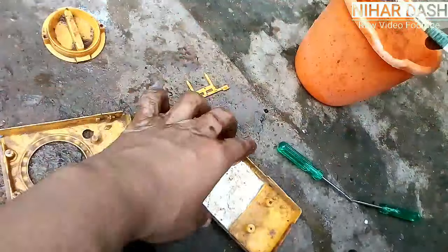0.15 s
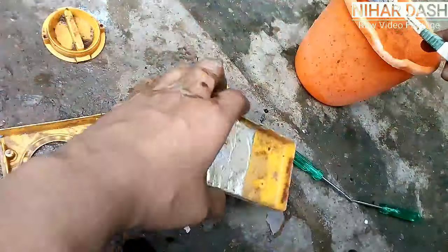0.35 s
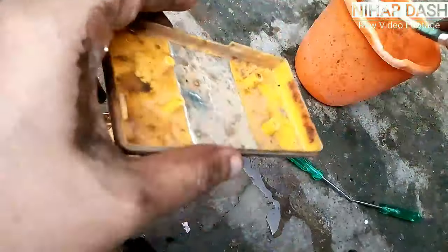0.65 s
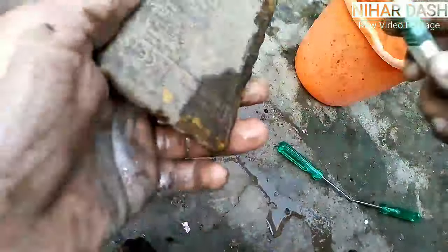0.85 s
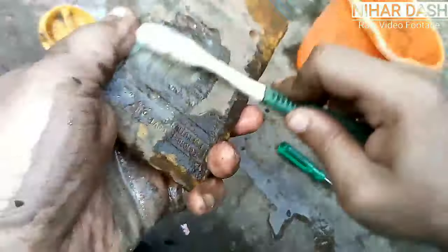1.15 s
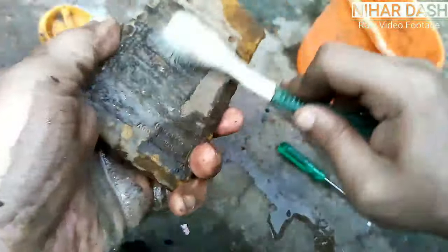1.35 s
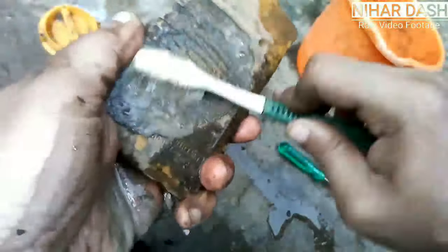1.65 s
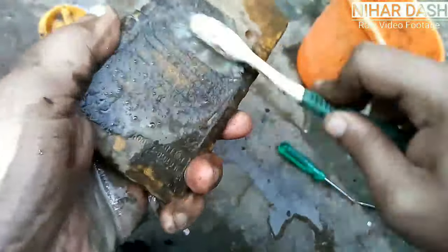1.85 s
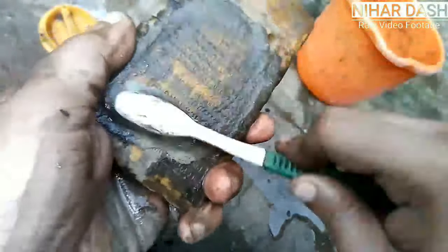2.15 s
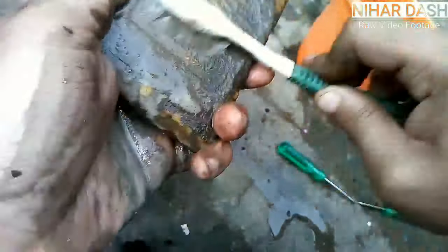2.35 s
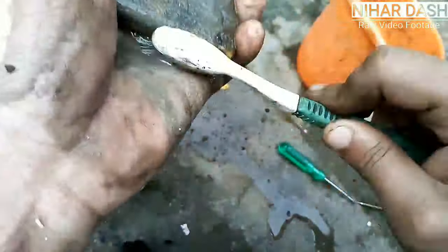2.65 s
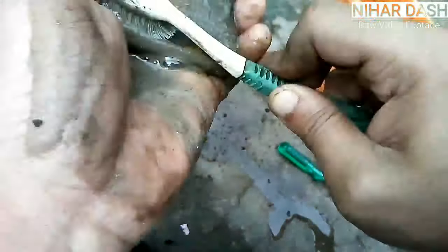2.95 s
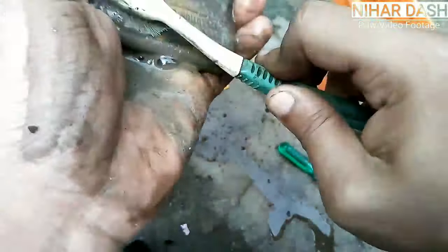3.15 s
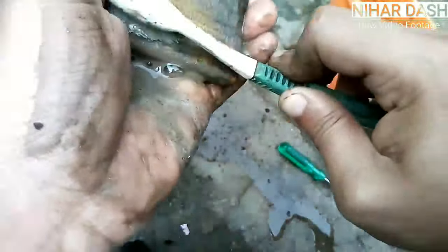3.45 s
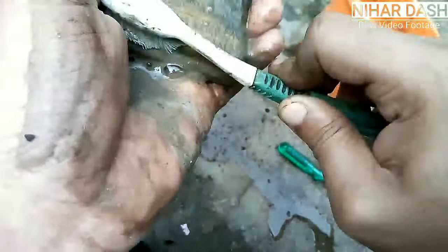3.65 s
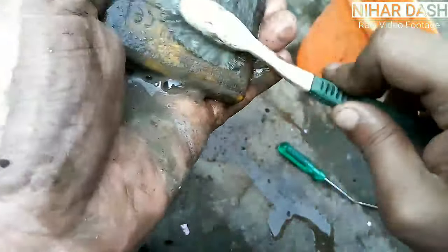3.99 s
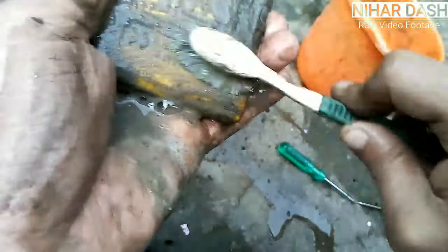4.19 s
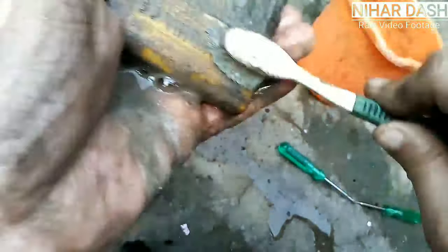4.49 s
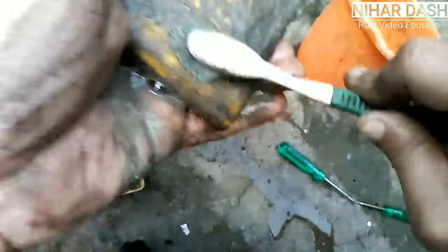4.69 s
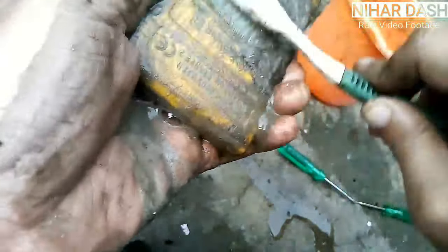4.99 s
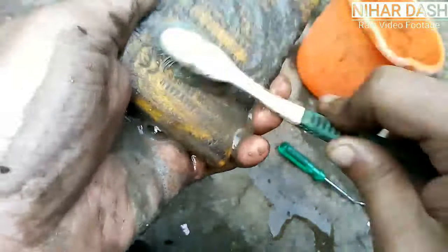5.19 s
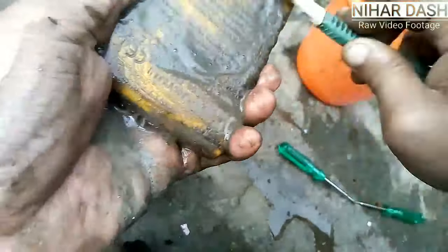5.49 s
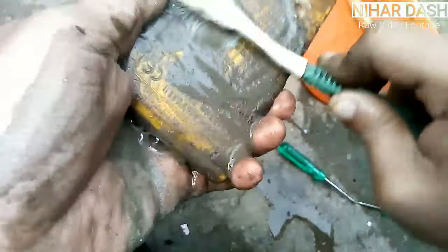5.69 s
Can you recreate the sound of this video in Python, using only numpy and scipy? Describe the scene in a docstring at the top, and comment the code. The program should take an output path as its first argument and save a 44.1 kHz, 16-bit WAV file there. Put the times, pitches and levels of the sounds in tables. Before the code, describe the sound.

A close, dry phone-like pickup of a toothbrush scrubbing a wet plastic case held in one hand. From 0 to 1.55 s, runs of quick, even strokes, roughly 20 to 30 a second, rasp with a boxy hollow tone; small wet squelches pop within them, and soft dull hand bumps come near 0.33, 0.85 and 1.45 s. After brief light touches, soapy, brighter strokes run from 1.8 s, fading very faint around 2.2-2.45 s. From 2.6 s brushing returns on the rim, thin and crisp with little hollow, and bent tufts snap sharply near 2.76, 3.0 and 3.45 s. From 4 s the corner gives slightly more body, with bright snaps at 4.5, 4.7 and 4.8 s. Scrubbing stops about 4.83 s. Faint murmuring air, thin wavering whistles and tiny chirps remain, with sparse tip grazes, a dull drop at 5.52 s and two light brushes near 5.8 s.

```python
"""A toothbrush scrubs a wet plastic case held in one hand, in runs of quick, even pushes and pulls.
Each stroke is a swarm of bristle slips that ring the thin wall and the hollow of the case, with a tone
that changes with the spot brushed. Wet tufts squelch as decaying sines; bent tufts snap free, and a drop
lands, as noise bursts into resonances. The hand bumps as damped sines and shifts its grip as dull noise.
At the end only the tips graze the case, over a faint wavering background of filtered noise."""
import sys
import numpy as np
from scipy import signal
from scipy.fft import rfft, irfft
from scipy.io import wavfile

SR = 44100
rng = np.random.default_rng(int(sys.argv[2]) if len(sys.argv) > 2 else 0)


def pcm_store(signal):
    """Save signal as 16-bit PCM."""
    levels = np.round(np.clip(np.atleast_2d(signal), -1, 1) * 32767)
    wavfile.write(sys.argv[1], SR, levels.astype(np.int16).T)


N = 257103
TIME = np.arange(N) / SR  # seconds

# Resonances of the case at each spot that is brushed.
# Each row: centre in Hz, width in Hz, relative level in dB.
FLAT_BACK = [(488, 107, -6), (795, 69, -9), (1082, 57, -1), (1271, 134, 4), (1760, 490, -5),
             (1670, 760, -2), (2860, 1200, -3), (4160, 340, -3.5), (4910, 1400, -0.5), (6500, 1130, 3.5)]
SOAPY_BACK = [(344, 59, -7), (1010, 120, -14), (1505, 160, -2.5), (2040, 220, 4.5), (2950, 370, 4),
              (5250, 1700, 4), (6890, 980, 11.5)]
RIM = [(452, 190, -26.5), (916, 140, -12), (2225, 600, -4.5), (3450, 1200, -12), (4030, 990, -6),
       (6180, 1020, 1), (6730, 1000, -3)]
CORNER = [(370, 123, -13), (745, 140, -15.5), (865, 150, -9.5), (1697.6, 220, -5.5), (2340, 630, 1),
          (3680, 690, 2.5), (4170, 1300, -28), (5760, 1040, 7), (7230, 820, 8.5)]
FAR_EDGE = [(1200, 820, -18), (3750, 260, -22), (5700, 620, -2), (6600, 330, 4), (7600, 360, 2),
            (8000, 410, -3)]
# The brush moves over the case. Each row: start in seconds, resonances of the spot.
SPOTS = [(0, FLAT_BACK), (1.6, SOAPY_BACK), (2.545, RIM), (3.99, CORNER), (5.4, FAR_EDGE)]


def undb(db):
    """Decibels to gain."""
    return 10 ** (np.asarray(db) / 20)


def unit(x):
    """Scale to rms 1."""
    return x / np.sqrt(np.mean(x ** 2) + 1e-20)


def peak(x, db):
    """Scale to a peak level."""
    return x * undb(db) / (np.abs(x).max() + 1e-20)


def colour(x, points, size=4096):
    """Causal minimum-phase filter through the given (Hz, dB) points, built by folding the cepstrum."""
    hz, db = np.transpose(points)
    grid = np.fft.rfftfreq(size, 1 / SR) + 1
    response_db = np.interp(np.log(grid), np.log(hz), db)
    cepstrum = irfft(np.log(undb(response_db)))
    cepstrum[1:size // 2] *= 2
    cepstrum[size // 2 + 1:] = 0
    impulse = irfft(np.exp(rfft(cepstrum)))
    return signal.fftconvolve(x, impulse)[:len(x)]


def ring(x, modes):
    """Parallel resonances (Hz, width in Hz, dB); neighbouring modes move in opposite directions."""
    out = 0
    for k, (hz, width, db) in enumerate(modes):
        b, a = signal.iirpeak(hz, hz / width, fs=SR)
        out = out + (-1) ** k * undb(db) * signal.lfilter(b, a, x)
    return out


def walk(rate):
    """Smooth random wander with a spread near 1, heading for a new value `rate` times a second."""
    knots = rng.standard_normal(N // 8)
    return 1.2 * np.interp(TIME * rate, np.arange(len(knots)), knots)


def swell(t, middle, length, steep):
    """Amplitude of one rub: it speeds up, then slows to a halt."""
    return np.exp(-np.abs(2 * (t - middle) / length) ** steep)


def add(out, s, x):
    """Mix a short sound in at time s."""
    start = int(s * SR)
    out[start:start + len(x)] += x[:N - start]


def tap(decay_s, size=4096):
    """A short rough contact force: decaying noise."""
    return rng.standard_normal(size) * np.exp(-np.arange(size) / SR / decay_s)


def narrow_band(hz, width):
    """A narrow, wavering band of noise, its sides steepened by two passes of one resonance."""
    mode = [(hz, width, 0)]
    return unit(ring(ring(rng.standard_normal(N), mode), mode))


def slips(rate, scatter_db, size=N):
    """Single bristles let go at random, `rate` a second, some much harder than others."""
    clicks = (rng.random(size) < rate / SR) * rng.choice([-1, 1], size)
    strength_db = scatter_db * np.clip(rng.standard_normal(size), -2, 2)
    return unit(clicks * undb(strength_db))


def rubbed(bristles, modes, drift, scatter_db):
    """Each resonance is fed by its own bristles; the contact point shifts its pitch and strength."""
    chance = np.clip(rng.standard_normal((len(modes), 2)), -2, 2)
    out = 0
    for force, (hz, width, db), (shift, strength) in zip(bristles, modes, chance):
        out = out + ring(force, [(hz * (1 + drift * shift), width, db + scatter_db * strength)])
    return out


def glance(x, gain_db, farthest_s, count=4):
    """Reflections off the palm, fingers and floor; their paths change with every stroke."""
    response = np.zeros(SR // 50)
    response[0] = 1
    for reach in rng.uniform(.15, 1, count):
        response[int(reach * farthest_s * SR)] += undb(gain_db)
    return signal.fftconvolve(x, response)[:len(x)]


def strokes():
    """The hand splits each run into equal pushes and pulls: (middle s, length s, bristle dB, hollow dB)."""
    # Runs of even back-and-forth strokes. Each row: start in seconds, end in seconds, number of strokes,
    # share of each stroke in contact, accent in dB (raises the first and every other stroke, lowers
    # the rest), nominal level of the hollow in dB relative to the bristles.
    runs = [(-.002, 0.105, 3, 0.93, -2.5, -7), (0.114, 0.187, 2, 0.92, 0, -10),
            (0.198, 0.275, 2, 0.72, 2, -9), (0.281, 0.454, 4, 0.8, 1, -7.5),
            (0.451, 0.547, 3, 0.88, -.5, -6.5), (0.536, 0.618, 2, 0.78, -2, -5),
            (0.622, 0.932, 8, 0.94, 1.5, -5), (0.929, 1.136, 5, 1, 1, -4.5),
            (1.143, 1.551, 10, 0.98, 0.7, -7.5), (1.791, 1.99, 4, 0.72, 1.5, -11.5),
            (1.994, 2.183, 4, 0.74, 1.5, -14), (2.159, 2.276, 2, 1, 1, -13),
            (2.27, 2.46, 4, 0.79, 1.5, -24), (2.62, 2.818, 5, 0.81, -1.5, -27),
            (2.836, 3.021, 4, 0.83, 0, -25.5), (3.128, 3.221, 2, 0.76, 0, -32),
            (3.23, 3.322, 3, 0.94, 3, -34), (3.336, 3.401, 2, 0.98, -1.5, -31),
            (3.4, 3.56, 4, 0.79, -2, -27.5), (3.569, 3.712, 4, 0.84, -1, -25),
            (3.718, 4.03, 8, 0.73, -0.5, -26), (4.04, 4.268, 6, 0.93, 0, -22.5),
            (4.273, 4.566, 7, 0.72, -1, -17.5), (4.568, 4.706, 4, 0.79, 0, -17.5),
            (4.716, 4.828, 3, 1, 0, -17.5)]
    # How hard the brush is pressed. Each row: time in seconds, nominal bristle level in dB.
    pressure = [(0, -33), (.2, -33.5), (.53, -33), (.565, -41.5), (.62, -36.5), (.82, -34), (1.1, -37.5),
                (1.2, -33), (1.36, -40), (1.53, -37.5), (1.84, -46.5), (1.95, -37.5), (2.16, -50),
                (2.21, -69), (2.25, -65.5), (2.31, -53), (2.44, -58.5), (2.63, -41), (2.75, -35.5),
                (2.8, -40.5), (3.0, -34), (3.16, -39.5), (3.42, -33), (3.97, -36.5), (4.42, -32.5),
                (4.81, -31)]
    # Single light touches of the tips. Each row: middle in seconds, length in seconds,
    # nominal bristle level in dB.
    touches = [(1.574, 0.038, -47.5), (1.651, 0.064, -48), (1.813, 0.22, -64), (2.504, 0.039, -48),
               (2.584, 0.048, -44.5), (3.061, 0.056, -47), (3.118, 0.018, -48.5), (4.871, 0.017, -64),
               (5.181, 0.015, -64.5), (5.46, .039, -73), (5.51, 0.029, -63.5), (5.623, 0.12, -65.5),
               (5.774, 0.055, -55), (5.813, 0.045, -51.5)]
    scatter_db, jitter_s = .5, .0006  # no two strokes are alike in strength and timing
    hollow_follows = 1  # an accented stroke wakes the hollow more: extra dB per dB of accent
    touch_hollow_db = -22  # nominal, relative to the bristles
    rows = []
    for start, end, number, contact, accent_db, hollow_db in runs:
        count = int(round(number))
        period = (end - start) / count
        for k, (late, strong) in enumerate(rng.standard_normal((count, 2))):
            middle = start + (k + .5) * period + jitter_s * late
            push_db = (-1) ** k * accent_db + scatter_db * strong
            db = np.interp(middle, *np.transpose(pressure)) + push_db
            rows.append((middle, contact * period, db, db + hollow_db + hollow_follows * push_db))
    for middle, length, db in touches:
        rows.append((middle, length, db, db + touch_hollow_db))
    return rows


def brush():
    """Stroke by stroke, the slips hiss on their own and ring the wall and the hollow of the case."""
    # Colour of the bare slip of a wet bristle. Each row: frequency in Hz, level in dB.
    slip_colour = [(200, -31), (1200, -23), (2100, -6.5), (4000, 0.5), (5500, -13.5), (6700, 13.5),
                   (7600, 8.5), (8500, 4), (11000, 0.5), (16000, -6)]
    hollow_top_hz = 1700  # resonances up to here belong to the hollow, those above to the wall
    sag_depth_db = 3.5  # each stroke bites at once, its bristles easing off this far from start to end
    # whole tufts give way together, so the slips come in bunches
    tufts = unit(undb(1.64 * np.clip(walk(700), -2, 2) + 1.0 * walk(130)))
    hiss = unit(colour(tufts * slips(rate=11000, scatter_db=7.0), slip_colour))
    # one stream of slips for each resonance; the flat back has the most
    bristles = np.array([tufts * slips(rate=9000, scatter_db=5.0) for _ in FLAT_BACK])
    hollow_band = signal.butter(2, [330, 1900], "bandpass", fs=SR, output="sos")
    wall_band = signal.butter(4, 1650, "highpass", fs=SR, output="sos")
    out = np.zeros(N)
    for middle, length, db, hollow_db in strokes():
        span = slice(*np.searchsorted(TIME, [middle - 2 * length, middle + 2 * length]))
        t = TIME[span]
        modes = [spot_modes for s, spot_modes in SPOTS if s <= middle][-1]
        wall_modes = [m for m in modes if m[0] > hollow_top_hz]
        hollow_modes = [m for m in modes if m[0] <= hollow_top_hz]

        wall = rubbed(bristles[:, span], wall_modes, drift=0.016, scatter_db=2.0)
        # a light touch sounds mostly the wall; a firm one adds broad bristle hiss
        hiss_db = min(-2.5, 0.5 + 0.6 * (db + 32))
        scrub = unit(signal.sosfilt(wall_band, wall)) + undb(hiss_db) * hiss[span]
        scrub = unit(glance(scrub, gain_db=-13.5, farthest_s=.005))
        sag_db = sag_depth_db * (t - middle) / length
        out[span] += undb(db + 0.48 - sag_db) * swell(t, middle, length, steep=3.22) * scrub

        # the hollow speaks most in the middle of the stroke, where the brush presses hardest
        hollow = rubbed(bristles[::-1, span], hollow_modes, drift=0.0095, scatter_db=1.0)
        hollow = signal.sosfilt(hollow_band, hollow)
        hollow = unit(glance(hollow, gain_db=-12.5, farthest_s=0.00707))
        press = swell(t, middle, .8 * length, steep=1.7)
        out[span] += undb(hollow_db - 0.64) * press * hollow
    return out


def background():
    """Wavering noise of the surroundings, low murmurs, two thin wavering whistles and faint chirps."""
    # Colour of the surroundings. Each row: frequency in Hz, level in dB.
    air_colour = [(20, -8), (50, -1.5), (85, 3), (160, 1.5), (280, -1), (450, -5.5), (1000, -10.5),
                  (2200, -15.5), (5000, -17.5), (7700, -31), (9000, -31.5), (13500, -34), (15200, -23)]
    # Low bands that swell and sink on their own. Each row: centre in Hz, width of one filter pass in Hz,
    # middle level in dB.
    murmur_bands = [(94, 170, -82.5), (136, 95, -84), (290, 180, -84.5)]
    # Thin whistles. Each row: centre in Hz, width of one filter pass in Hz, relative level in dB.
    whistle_bands = [(6080, 270, 2.5), (7670, 370, -7.5)]
    # Faint thin chirps. Each row: middle in seconds, length in seconds, level in dB, centre in Hz,
    # width of one filter pass in Hz.
    chirp_rows = [(4.95, 0.041, -72, 4600, 395), (5.028, 0.06, -72.5, 2590, 100),
                  (5.639, 0.035, -65, 4850, 451)]
    air = unit(colour(rng.standard_normal(N), air_colour)) * undb(1.0 * walk(16))
    out = undb(-68) * air
    for hz, width, db in murmur_bands:
        wander_db = 7.3 * np.clip(walk(16), -2, 2)
        out += undb(db + wander_db) * narrow_band(hz, width)
    for hz, width, db in whistle_bands:
        out += undb(db - 75.5) * narrow_band(hz, width)
    for s, length, db, hz, width in chirp_rows:
        out += undb(db) * swell(TIME, s, length, steep=5.6) * narrow_band(hz, width)
    return out


def squelches():
    """Wet tufts squelch against the back: short sines that swell and die within milliseconds."""
    # Each row: start in seconds, peak in dB, pitch in Hz.
    squelch_rows = [(0.0442, -29.5, 1257), (0.1485, -26, 1427), (0.424, -35, 990), (0.4973, -31, 1130),
                    (0.66, -32.5, 1130), (1.1096, -33.5, 1234), (1.1672, -31, 1270), (1.257, -32, 1280),
                    (1.324, -34.5, 1300), (1.409, -36, 1300)]
    out = np.zeros(N)
    t = TIME[:SR // 20]
    for s, db, hz in squelch_rows:
        add(out, s, peak(t * np.exp(-t / 0.002) * np.sin(2 * np.pi * hz * t), db))
    return out


def hand():
    """Heavily damped bumps, the dull rub of skin on wet plastic, and a low rumble as the case is turned."""
    # Soft bumps on the case. Each row: start in seconds, peak in dB, pitch in Hz, decay in seconds.
    bumps = [(0.335, -39.5, 129, 0.004), (0.847, -30, 140, 0.0023), (0.856, -41, 86, 0.0084),
             (0.923, -41.5, 95.5, 0.0044), (1.453, -37, 112, 0.0022), (1.466, -46.5, 89, 0.0076)]
    # Fingers shifting their grip. Each row: middle in seconds, length in seconds, level in dB.
    grips = [(0.346, 0.087, -45), (1.478, 0.035, -52), (2.172, 0.0072, -52), (2.335, 0.0099, -55.5),
             (3.942, 0.032, -51.5), (4.827, 0.014, -62), (5.15, 0.033, -71), (5.294, 0.033, -87)]
    # Colour of skin on wet plastic. Each row: frequency in Hz, level in dB.
    grip_colour = [(25, -22), (80, -10.5), (160, 5.5), (300, -5), (600, 1.5), (1200, -9.5), (4000, -72)]
    grip = sum(undb(db) * swell(TIME, s, length, steep=0.67) for s, length, db in grips)
    out = grip * unit(colour(rng.standard_normal(N), grip_colour))
    rumble = unit(ring(rng.standard_normal(N), [(65, 96, 0)]))
    out += undb(-63) * swell(TIME, middle=2.97, length=.22, steep=8.5) * rumble
    t = TIME[:SR // 5]
    for s, db, hz, decay_s in bumps:
        add(out, s, peak(-t * np.exp(-t / decay_s) * np.sin(2 * np.pi * hz * t), db))
    return out


def snaps():
    """A bent tuft springs free of the case with a bright tick and a knock."""
    # Each row: start in seconds, peak of the tick in dB, peak of the knock in dB relative to the tick.
    snap_rows = [(1.916, -27, -18), (2.7588, -19, -24), (2.987, -23, -14), (3.002, -31, 0),
                 (3.0078, -20, -6), (3.0205, -35, 0), (3.435, -22, -24), (3.453, -19, -22),
                 (4.499, -22, -20), (4.689, -22, -18), (4.805, -18, -20), (5.6055, -49, -24)]
    # Resonances of the tick, then of the knock. Each row: centre in Hz, width in Hz, relative level in dB.
    tick_modes = [(2500, 1500, 1), (5450, 160, 12.5), (5960, 930, -2), (6390, 200, 22.5)]
    knock_modes = [(860, 110, -7), (1250, 300, -17), (1750, 350, -11), (2850, 330, 0)]
    out = np.zeros(N)
    for s, db, knock_db in snap_rows:
        tick = ring(tap(decay_s=0.001), tick_modes)
        knock = ring(tap(decay_s=0.0027), knock_modes)
        add(out, s, peak(tick, db) + peak(knock, db + knock_db))
    return out


def drop():
    """One dull plop as a drop lands on the floor: a short tap rings a few broad resonances."""
    # Each row: centre in Hz, width in Hz, relative level in dB.
    drop_modes = [(377, 140, -1), (754, 130, 1), (1389, 200, -5), (1739, 200, -5), (4500, 1500, -24)]
    out = np.zeros(N)
    plop = ring(tap(decay_s=0.001), drop_modes)
    add(out, 5.5245, peak(plop, db=-43))
    return out


def scene():
    """The close handling sounds, coloured by the microphone, over the background."""
    # Response of the microphone. Each row: frequency in Hz, gain in dB.
    mic_response = [(20, 2), (7300, 1.5), (8200, -3.5), (10000, -6.5), (12000, -12.5), (13700, -11),
                    (14700, -0.5), (16000, 1)]
    close = brush() + squelches() + hand() + snaps() + drop()
    return (colour(close, mic_response) + background())[None]


def record(dry):
    """The phone cuts the top steeply above 15550 Hz."""
    return signal.sosfilt(signal.ellip(10, .2, 80, 15550, fs=SR, output="sos"), dry)


dry = scene()
out = record(dry)
pcm_store(out)
```